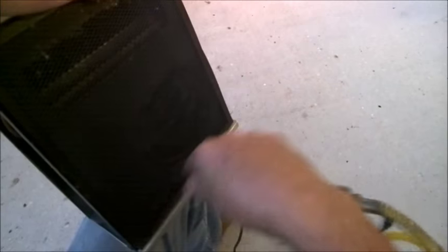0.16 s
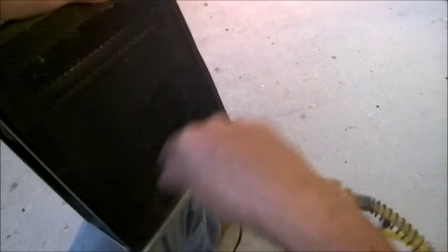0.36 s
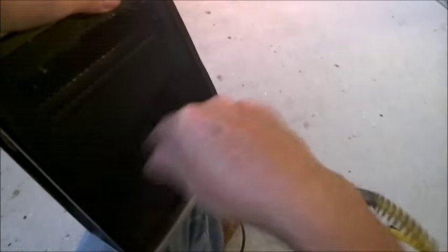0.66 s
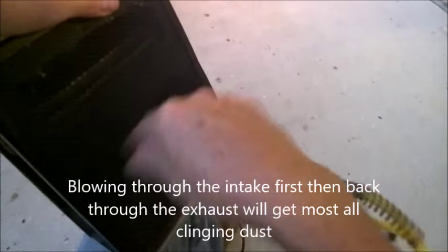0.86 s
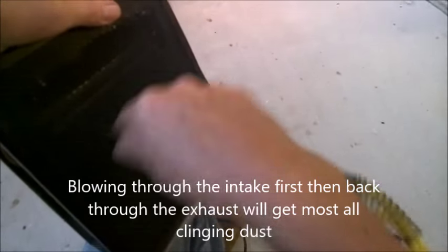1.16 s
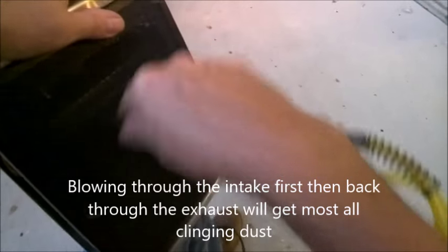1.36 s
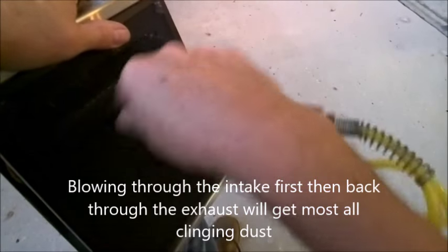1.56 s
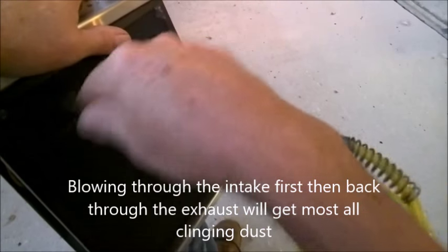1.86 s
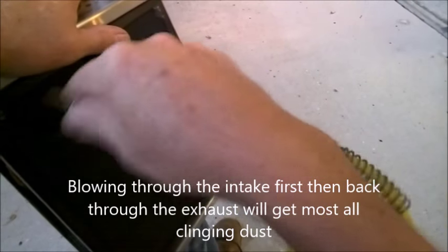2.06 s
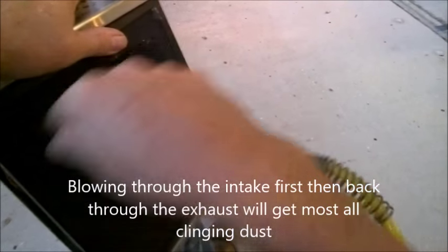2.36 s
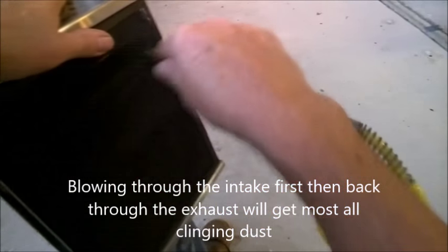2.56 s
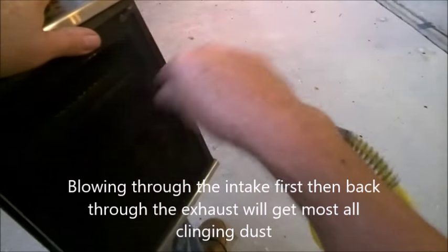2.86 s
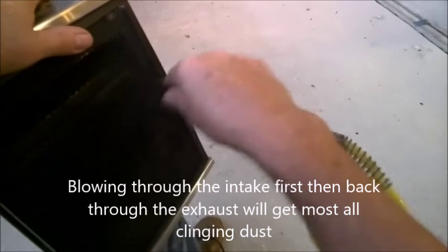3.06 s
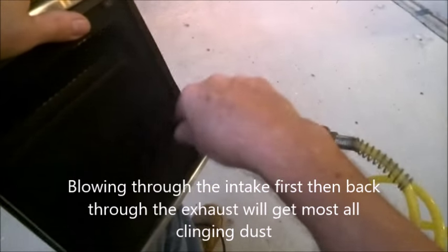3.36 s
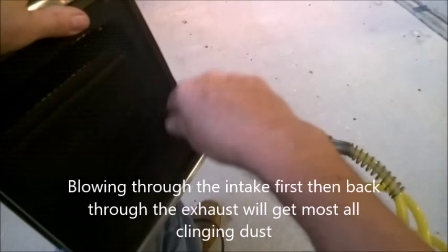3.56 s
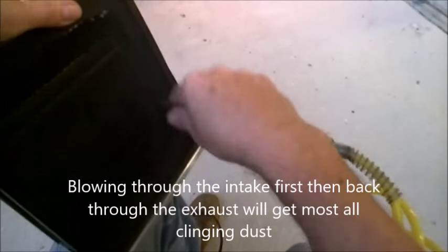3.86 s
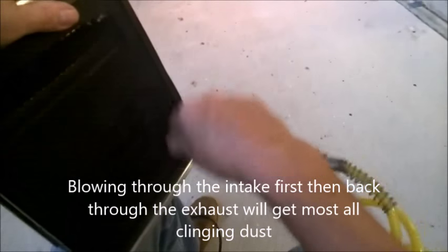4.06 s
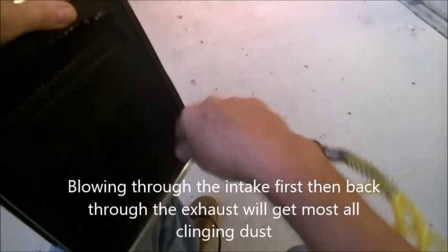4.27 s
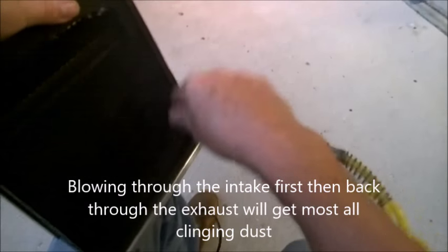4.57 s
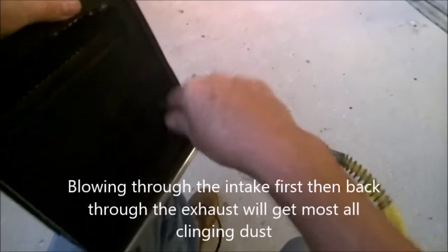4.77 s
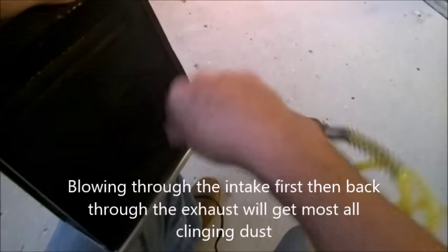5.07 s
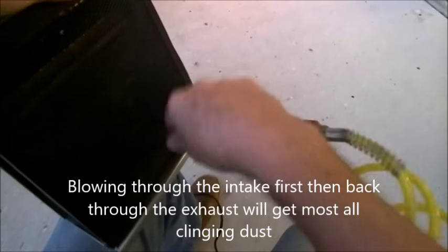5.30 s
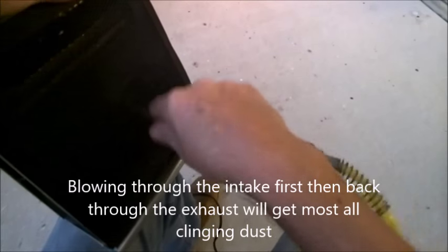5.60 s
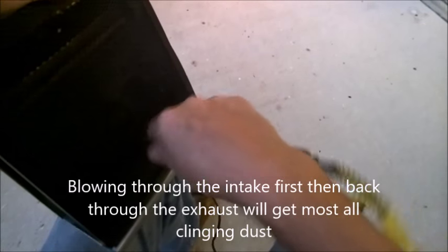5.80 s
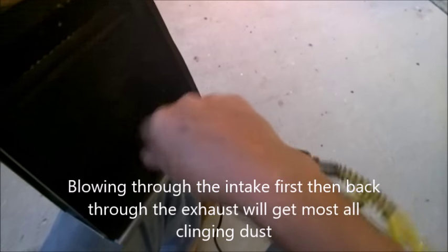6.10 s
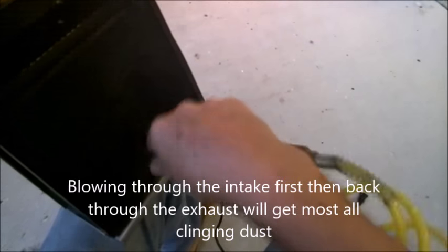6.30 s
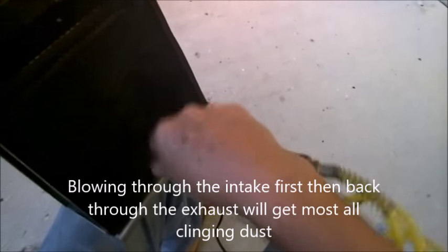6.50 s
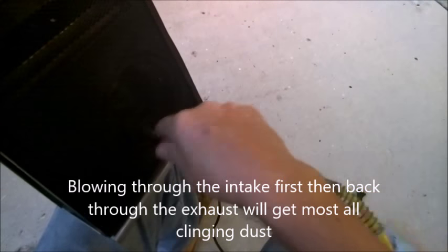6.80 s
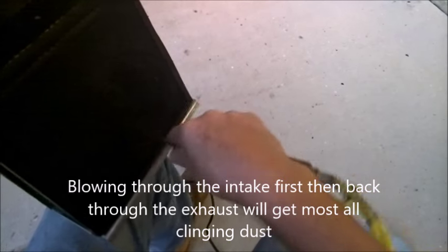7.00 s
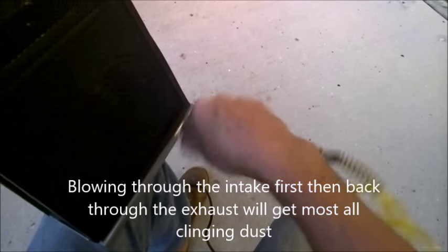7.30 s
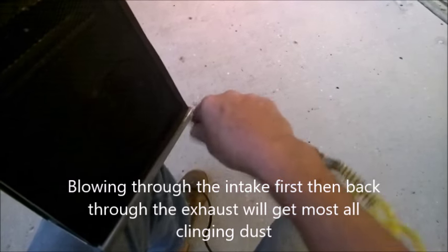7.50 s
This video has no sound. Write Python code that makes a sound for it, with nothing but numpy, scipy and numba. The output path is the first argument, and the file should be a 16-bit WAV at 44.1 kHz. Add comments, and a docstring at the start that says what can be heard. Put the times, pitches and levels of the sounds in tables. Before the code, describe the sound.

Steady compressed air blasts through a heater cabinet in a garage, heard close and dry, the same on both sides. A sharp hiss and grille rush stay constant while the housing roar and low drone flutter. From under two seconds, gaps and edges add soft puffs and small gusts; midway these become lower and duller, then a calmer spell leads to rapid, sweeping swishes at the end.

```python
"""A blow gun hisses steadily at its nozzle, close by, as it is swept over the vents of a heater.
The jet rushes over the grille slats, chuffs at gaps and edges, roars throughout in the fan housing,
louder when it finds an opening, and spilling air makes the cabinet drone and buffets its panels.
Each layer is coloured, fluttering noise with a moving spectral hollow; each chuff is a short burst
of band-passed noise. Chokes remove lows; the treble thins briefly at dips. Both channels are alike."""
import sys
import numpy as np
from scipy import signal
from scipy.fft import rfft, irfft, next_fast_len
from scipy.io import wavfile
from scipy.ndimage import uniform_filter1d
from numba import njit

SR = 44100
rng = np.random.default_rng(int(sys.argv[2]) if len(sys.argv) > 2 else 0)


def to_wav(s):
    """Save 16-bit WAV."""
    ch = np.atleast_2d(s).T  # columns
    pcm = np.round(np.clip(ch, -1, 1) * 32767)  # PCM
    wavfile.write(sys.argv[1], SR, pcm.astype(np.int16))


N = 337365

# Spectral shapes of the layers. Each row: frequency in Hz, density in dB per Hz (relative).
BUFFET_COLOUR = [(12, -1), (28, 2), (60, 2), (100, 0.5), (125, 2), (200, -56)]
DRONE_COLOUR = [(70, -11.5), (125, -6), (170, -2.5), (230, -3), (320, -2.5), (420, -22), (650, -45)]
HOUSING_COLOUR = [(200, -23), (320, -5.5), (420, -1), (540, 0.5), (660, 0.5), (850, -0.5), (1100, -8),
                  (1600, -23)]
GRILLE_COLOUR = [(400, -58), (800, -13), (1100, -0.5), (1500, -0.5), (2100, -2), (3000, -5), (4200, -8.5),
                 (7000, -15)]
NOZZLE_COLOUR = [(300, -15), (1500, -11), (3000, -0.5), (4200, -0.9), (6000, -1.5), (8000, -1.5),
                 (10000, -1.5), (11500, -4), (13000, -26)]
SIZZLE_COLOUR = [(9000, -12.5), (11000, -3.5), (12500, 2), (14300, -0.5)]

# Air pushed through the cabinet, before event lifts.
# Each row: time in seconds, drone level in dB, buffeting level in dB.
CABINET_LEVELS = [(0, -46.5, -53.5), (1.55, -45.5, -53), (1.8, -46.5, -58), (2.3, -48, -53),
                  (3.3, -46, -53), (4.4, -50, -54), (5.2, -47, -53), (6.15, -47, -52.5), (6.4, -46, -50),
                  (7.0, -47.5, -54), (7.65, -50, -55.5)]
# Roar of the fan housing, before gust lifts. Each row: time in seconds, level in dB.
HOUSING_LEVELS = [(0, -37), (1.5, -38.5), (2.1, -37), (2.6, -38.5), (3.7, -37), (4.95, -39), (5.8, -36),
                  (6.15, -38), (6.45, -37), (7.0, -38.5), (7.65, -42.5)]
# Rush on the slats, before gust lifts. Each row: time in seconds, level in dB.
GRILLE_LEVELS = [(0, -35.5), (1.5, -36), (2.3, -36), (3.3, -35.5), (4.2, -36), (5.2, -36), (6.4, -35.5),
                 (7.0, -36.5), (7.65, -39)]
# Hiss at the tip as the gun is turned, before it yields to the drone.
# Each row: time in seconds, level in dB.
NOZZLE_LEVELS = [(0, -38), (1.9, -38), (2.3, -37), (2.45, -36.5), (2.58, -40), (2.85, -36.5), (3.0, -39),
                 (4.3, -37.5), (4.9, -39.5), (5.85, -38.5), (6.4, -37.5), (6.7, -38.5), (7.02, -36.2),
                 (7.15, -38.5), (7.65, -37.5)]
# Sizzle at the top of the hiss. Each row: time in seconds, level in dB.
SIZZLE_LEVELS = [(0, -39.5), (1, -40), (2, -40.5), (2.6, -41.5), (3.5, -39), (4.7, -39.5), (5.6, -39),
                 (6.4, -38.5), (7.65, -41)]

# Path of the spectral hollow: slow drift, with quick sweeps near 1.8 s and after 7.1 s.
# Each row: time in seconds, centre in Hz.
HOLLOW_PATH = [(1.58, 20), (1.705, 330), (1.79, 120), (1.85, 580), (1.89, 310), (1.92, 350), (1.96, 20),
               (2.75, 32), (3.22, 250), (3.29, 390), (3.68, 310), (3.78, 120), (4.05, 69), (4.15, 280),
               (4.36, 110), (4.48, 250), (4.68, 120), (4.9, 230), (5.12, 250), (5.28, 330), (5.5, 180),
               (5.62, 290), (5.85, 210), (6.28, 217), (6.38, 99), (6.72, 98), (6.88, 340), (7.0, 260),
               (7.06, 230), (7.11, 150), (7.15, 2800), (7.195, 3100), (7.22, 660), (7.25, 1200),
               (7.278, 380), (7.325, 1300), (7.37, 1700), (7.4, 3000), (7.422, 440), (7.473, 3000),
               (7.495, 2100), (7.535, 3600), (7.562, 3300), (7.582, 1800), (7.605, 4400), (7.64, 1300)]
# A swerve of the hand pulls the hollow away and lets it back.
# Each row: middle in seconds, length in seconds, target centre in Hz.
SWERVES = [(1.669, 0.034, 1750), (2.459, 0.066, 616), (2.949, 0.047, 480), (3.135, 0.08, 1980),
           (3.319, 0.035, 716), (3.493, .04, 560), (3.568, 0.096, 810), (4.23, 0.044, 660),
           (4.576, 0.11, 444), (4.823, 0.074, 413), (4.998, 0.11, 503), (5.423, 0.047, 680),
           (6.528, 0.088, 300), (6.803, 0.068, 540)]

# The jet gusts into an opening or slips off it. Each row: middle in seconds, length in seconds,
# lift of the grille in dB, of the housing in dB, of the drone in dB.
GUSTS = [(.64, 0.024, -12, 1.5, -1), (.67, 0.014, 3.5, -5, -2), (.855, 0.015, 5.5, 3, 6),
         (1.672, 0.058, 0, -3, -1), (1.73, 0.073, 2, 2, -1), (1.968, 0.056, 0.5, 3, 7),
         (2.178, 0.04, 0.5, -1, 5), (2.52, 0.01, 5, -12, 1), (2.905, 0.018, 0, 1, -1),
         (2.98, 0.041, -2.5, 3, 2.5), (3.062, 0.1, -1, -7.5, -1), (3.14, 0.067, 0.5, 5, 5.5),
         (3.385, 0.047, 0.5, 5.5, -2), (3.475, 0.052, 0, -0.5, 3), (3.76, 0.094, 0, 2.5, 4),
         (3.645, 0.051, 1, -9, 0), (4.235, 0.049, 0, -5, 3.5), (4.35, 0.058, 1, 0.5, 2),
         (4.68, 0.2, 1.5, 3, -2), (5.115, 0.061, 0, 3.5, 2), (5.36, 0.06, 0, 4, -1.5),
         (5.438, 0.068, 1, -5, -2.5), (5.54, 0.103, -1, 4.5, -1), (6.805, 0.022, -12, -7, -3),
         (6.853, 0.022, -7, 3.5, -3), (6.897, 0.036, 1.5, -4, -3), (7.012, 0.04, -5, -5.5, -3),
         (7.08, 0.014, 1.5, 7, 4), (7.185, 0.034, 3, 6, 8), (7.37, 0.011, 0, 7, 2),
         (7.425, 0.035, 2, -7, -1), (7.468, 0.022, 4.5, -5, -4), (7.545, 0.041, 5.5, 8, 7)]
# Spilling air buffets the panels. Each row: middle in seconds, length in seconds, lift in dB.
BUFFETS = [(2.3, 0.2, 6), (2.62, 0.11, 2), (3.16, 0.099, 7), (3.55, 0.038, 10), (3.603, 0.052, 8),
           (3.998, 0.075, 11.5), (4.57, 0.11, 5), (4.82, 0.066, 6), (5.01, 0.091, -2), (6.56, 0.056, 9),
           (6.8, 0.043, 12.5), (6.875, 0.087, 9), (7.19, 0.068, 6), (7.44, 0.13, 9)]
# The jet crosses a gap or an edge and chuffs.
# Each row: middle in seconds, length in seconds, centre in Hz, level in dB.
CHUFFS = [(1.72, 0.023, 796, -36), (1.962, 0.041, 620, -36.5), (2.599, .014, 890, -32),
          (2.645, 0.022, 750, -35.5), (2.806, 0.024, 950, -40), (2.909, 0.024, 1150, -34.5),
          (3.001, 0.0083, 850, -32.5), (3.051, 0.042, 1150, -35.5), (3.108, 0.025, 490, -35),
          (3.372, 0.032, 514, -33.5), (3.42, 0.022, 466, -35), (3.602, .03, 415, -38.5),
          (4.342, 0.056, 450, -39), (4.577, 0.074, 130, -47), (4.817, 0.06, 109, -45),
          (5.016, 0.056, 125, -41), (5.112, 0.033, 516, -35), (5.268, 0.013, 646, -34),
          (5.337, 0.037, 800, -39), (5.566, 0.026, 524, -44), (6.839, 0.03, 1190, -36),
          (6.973, 0.032, 550, -38), (7.076, 0.03, 1210, -34), (7.156, 0.017, 900, -40),
          (7.215, 0.029, 2300, -39), (7.276, 0.033, 1300, -37), (7.314, 0.019, 550, -38),
          (7.374, 0.015, 1130, -34.5), (7.426, 0.027, 1710, -38.5), (7.497, 0.038, 2680, -37.5),
          (7.524, 0.021, 554, -35), (7.594, 0.049, 560, -37), (7.633, 0.011, 2000, -35.5)]
# The nozzle passes close over solid metal and the large eddies are choked.
# Each row: middle in seconds, length in seconds, low-pass corner of the lost band in Hz, loss in dB.
CHOKES = [(1.643, 0.042, 272, -18), (1.748, 0.053, 330, -16), (1.795, .03, 100, -10),
          (1.848, 0.039, 600, -8), (2.042, 0.03, 190, -16), (2.122, .03, 190, -16),
          (2.424, 0.015, 1500, -16), (2.471, 0.059, 330, -22), (2.851, 0.05, 2200, -14.5),
          (2.912, 0.038, 170, -16), (2.936, 0.028, 3000, -9), (3.014, 0.016, 900, -15),
          (3.079, 0.018, 500, -13), (3.31, 0.049, 500, -11), (3.365, 0.057, 120, -18),
          (3.481, 0.038, 500, -16), (3.72, .04, 100, -16), (3.83, 0.07, 280, -11), (4.09, .04, 169, -12),
          (4.408, 0.03, 120, -16), (4.475, .04, 300, -4), (4.7, 0.097, 110, -14), (5.3, 0.014, 584, -7),
          (5.608, 0.014, 700, -19), (6.348, 0.15, 131, -18), (6.47, 0.091, 133, -18),
          (6.702, 0.03, 134, -13), (7.088, 0.055, 170, -16), (7.131, 0.034, 2200, -10),
          (7.278, 0.022, 600, -12), (7.335, .016, 170, -14), (7.642, 0.014, 600, -10)]
# The treble thins briefly; only its strongest partials ring on.
# Each row: middle in seconds, length in seconds,
# threshold in dB over the neighbouring partials (in the treble), below which partials sink.
DIPS = [(.364, .02, 4.8), (.407, .02, 5.8), (.532, .014, 5.2), (.854, .019, 6.2), (1.132, .016, 5.6),
        (1.475, .019, 7), (1.71, .018, 4.4), (1.75, .02, 4.8), (2.048, .02, 6), (2.113, .018, 6.8),
        (2.178, .02, 4.8), (2.455, .022, 4), (2.946, .026, 6.2), (3.29, .012, 4.4), (4.485, .018, 5),
        (5.218, .032, 6.8), (5.272, .02, 6.5), (5.528, .018, 5.8), (6.147, .02, 5.8), (6.443, .018, 7),
        (6.551, .02, 5.4), (6.7, .018, 4.6), (6.807, .02, 4.8), (6.892, .022, 5.4), (7.191, .024, 4.8),
        (7.426, .022, 4.8), (7.533, .02, 5.4)]

# Edge times of the events.
GUST_RAMP_S, CHUFF_RAMP_S, CHOKE_RAMP_S = 0.0038, 0.008, 0.008  # gusts and buffets share one
SWERVE_RAMP_S, DIP_RAMP_S = 0.04, 0.014
DRONE_FOLLOWS = 0.62  # share of a buffet's lift in dB that reaches the drone
HISS_YIELDS = 0.54  # share of the drone's lift in dB that the hiss loses
CHUFF_OCTAVES = 0.99  # bandwidth
DIP_LOW_HZ, DIP_FULL_HZ, DIP_TOP_HZ = 700, 4680, 12800  # a dip acts from LOW to TOP
DIP_EASE_DB_PER_OCTAVE = 3  # drop of the threshold below DIP_FULL_HZ
DIP_LOSS_DB, DIP_RING_DB = -30.5, 2  # weak partials sink, strong ones swell
CUTOFF_HZ = 14300


def from_db(db):
    """Decibels to gain."""
    return 10 ** (np.asarray(db) / 20)


def in_time(rows):
    """Each column of a curve, joined by straight lines, at every sample."""
    seconds, *columns = np.transpose(rows)
    return [np.interp(np.arange(N) / SR, seconds, column) for column in columns]


def swell(middle_s, length_s, ramp_s):
    """Smooth rise from 0, hold and fall; peaks at 1 unless shorter than its ramp."""
    inside_s = length_s / 2 - np.abs(np.arange(N) / SR - middle_s)
    rise = np.clip(inside_s / ramp_s + 0.5, 0, 1)
    return rise * rise * (3 - 2 * rise)


def lifts(rows):
    """Each level column of an event table, summed as dB at every sample."""
    return sum(np.outer(db, swell(middle_s, length_s, GUST_RAMP_S))
               for middle_s, length_s, *db in rows)


def drift(rate_hz):
    """Slow chance of spread 1: white noise through two equal poles at the given rate."""
    step = 40  # samples between drawn points
    pole = np.exp(-2 * np.pi * rate_hz * step / SR)
    draws = rng.standard_normal(N // step + 2002)
    slow = signal.lfilter([1], [1, -2 * pole, pole * pole], draws)[2000:]  # settled part
    return np.interp(np.arange(N) / step, np.arange(len(slow)), slow / slow.std())


@njit
def sliding_band(x, tuning, damping):
    """A state-variable resonator, retuned at every sample, passes its own band at gain 1."""
    out, band_state, low_state = np.empty(len(x)), 0., 0.
    for i in range(len(x)):
        g = tuning[i]
        band = (band_state + g * (x[i] - low_state)) / (1 + g * (g + damping))
        low_state += 2 * g * band
        band_state = 2 * band - band_state
        out[i] = damping * band
    return out


def moving_hollow(waver=0.07, depth_db=-24, depth_spread_db=4):
    """Tuning and depth of the hollow; swerves pull it from its path and eddies shake it."""
    log_hz, = in_time([(s, np.log(hz)) for s, hz in HOLLOW_PATH])
    for middle_s, length_s, target_hz in SWERVES:
        pull = swell(middle_s, length_s, SWERVE_RAMP_S)
        log_hz = log_hz + (np.log(target_hz) - log_hz) * pull
    centre_hz = np.exp(log_hz + waver * drift(45))
    remains = from_db(np.minimum(depth_db + depth_spread_db * drift(25), 0))
    return np.tan(np.pi * centre_hz / SR), 1 - remains


def hollowed(x, hollow, width=1.3, refill=0.079, rim=0.088, rim_ratio=2.04, rim_width=0.97):
    """Sound from inside and outside the cabinet partly cancels in one band, adds up in a rim above."""
    tuning, depth = hollow
    cut = x - depth * sliding_band(x, tuning, width)
    power_before, power_after = uniform_filter1d(np.square([x, cut]), size=1300, axis=1)
    cut = cut + rim * sliding_band(cut, tuning * rim_ratio, rim_width)
    return cut * np.sqrt(power_before / power_after) ** refill  # restores a little of the lost level


def turbulence(colour, hollow, flutter_db, flutter_hz):
    """Coloured noise, fluttering as eddies pass, at rms 1 before the hollow is cut."""
    size = next_fast_len(N, True)
    hz = np.maximum(np.fft.rfftfreq(size, 1 / SR), 1)
    points_hz, points_db = np.transpose(colour)
    octaves_outside = np.abs(np.log2(hz / np.clip(hz, points_hz[0], points_hz[-1])))
    shape_db = np.interp(np.log(hz), np.log(points_hz), points_db) - 20 * octaves_outside
    noise = irfft(rfft(rng.standard_normal(size)) * from_db(shape_db), size)[:N]
    noise = noise * from_db(flutter_db * drift(flutter_hz))
    return hollowed(noise / noise.std(), hollow)


def cabinet(hollow, inside_db, spill_db):
    """The largest eddies make the cabinet drone and buffet its panels."""
    drone_db, buffet_db = in_time(CABINET_LEVELS)
    drone = turbulence(DRONE_COLOUR, hollow, flutter_db=2.3, flutter_hz=20)
    buffet = turbulence(BUFFET_COLOUR, hollow, flutter_db=2.0, flutter_hz=11)
    return from_db(drone_db + inside_db) * drone + from_db(buffet_db + spill_db) * buffet


def housing(hollow, lift_db):
    """The fan housing roars throughout in a broad resonance, louder when the jet finds an opening."""
    level_db, = in_time(HOUSING_LEVELS)
    roar = turbulence(HOUSING_COLOUR, hollow, flutter_db=1.25, flutter_hz=32)
    return from_db(level_db + lift_db) * roar


def grille(hollow, lift_db):
    """The slats break the jet into a mid-pitched rush."""
    level_db, = in_time(GRILLE_LEVELS)
    rush = turbulence(GRILLE_COLOUR, hollow, flutter_db=1.14, flutter_hz=25)
    return from_db(level_db + lift_db) * rush


def chuffs():
    """Each gap or edge that the jet crosses sounds briefly in a broad resonance of its own pitch."""
    out, half_band = np.zeros(N), 2 ** (CHUFF_OCTAVES / 2)
    for middle_s, length_s, hz, db in CHUFFS:
        edges_hz = [hz / half_band, hz * half_band]
        resonance = signal.butter(2, edges_hz, "band", fs=SR, output="sos")
        band = signal.sosfilt(resonance, rng.standard_normal(N))
        puff = band * swell(middle_s, length_s, CHUFF_RAMP_S)
        rms = np.sqrt(np.sum(puff ** 2) / (length_s * SR))
        out += from_db(db) * puff / rms
    return out


def choke(x):
    """Solid metal close to the nozzle chokes the large eddies: the lows sink."""
    for middle_s, length_s, hz, db in CHOKES:
        low_pass = signal.butter(2, hz, fs=SR, output="sos")
        lows = signal.sosfiltfilt(low_pass, x)
        x = x - lows * (1 - from_db(db * swell(middle_s, length_s, CHOKE_RAMP_S)))
    return x


def thin_out(x, size=2048):
    """At each dip weak partials drop away and the strongest ring on, most sparsely in the treble."""
    out, hz = x.copy(), np.fft.rfftfreq(size, 1 / SR)
    octaves_from_full = np.log2(np.clip(hz, DIP_LOW_HZ, DIP_FULL_HZ) / DIP_FULL_HZ)
    eased_db = DIP_EASE_DB_PER_OCTAVE * octaves_from_full
    reached = (hz > DIP_LOW_HZ) & (hz < DIP_TOP_HZ)
    for middle_s, length_s, db in DIPS:
        near = np.arange(size) + int(middle_s * SR) - size // 2
        partials = rfft(x[near])
        neighbours = uniform_filter1d(np.abs(partials), size=60)
        weak = np.abs(partials) < from_db(db + eased_db) * neighbours
        gain = from_db(np.where(weak, DIP_LOSS_DB, DIP_RING_DB) * reached)
        change = irfft(partials * (gain - 1))
        out[near] += change * swell(middle_s, length_s, DIP_RAMP_S)[near]
    return out


def nozzle(hollow, inside_db):
    """The finest eddies, at the tip, give an even, bright hiss and a separately varying sizzle on top."""
    (hiss_db,), (sizzle_db,) = in_time(NOZZLE_LEVELS), in_time(SIZZLE_LEVELS)
    hiss = turbulence(NOZZLE_COLOUR, hollow, flutter_db=0.5, flutter_hz=11)
    sizzle = turbulence(SIZZLE_COLOUR, hollow, flutter_db=1.0, flutter_hz=31)
    return from_db(hiss_db - HISS_YIELDS * inside_db) * hiss + from_db(sizzle_db) * sizzle


def scene():
    """All the air noise comes from one spot, alike in both channels."""
    hollow = moving_hollow()
    grille_db, housing_db, drone_db = lifts(GUSTS)
    spill_db, = lifts(BUFFETS)
    inside_db = drone_db + DRONE_FOLLOWS * spill_db
    air = cabinet(hollow, inside_db, spill_db)
    air += housing(hollow, housing_db)
    air += grille(hollow, grille_db)
    air += nozzle(hollow, inside_db)
    air = thin_out(choke(air) + chuffs())
    return np.array([air, air])


def record(dry):
    """The top is cut steeply."""
    low_pass = signal.ellip(16, 0.1, 80, CUTOFF_HZ, fs=SR, output="sos")
    return signal.sosfilt(low_pass, dry)


dry = scene()
out = record(dry)
to_wav(out)
```